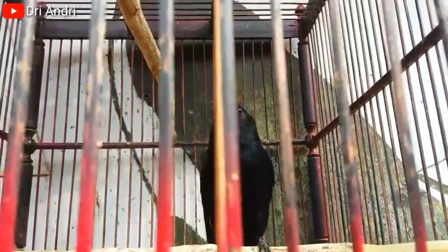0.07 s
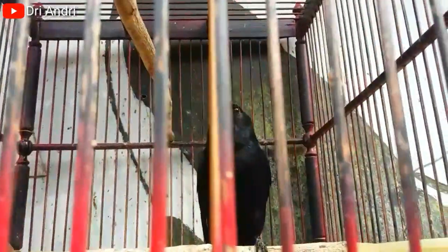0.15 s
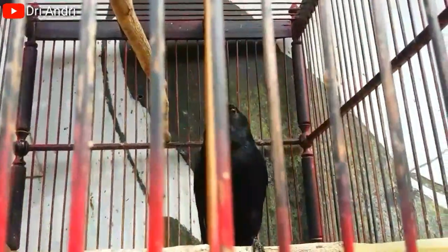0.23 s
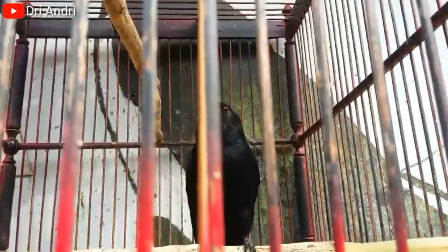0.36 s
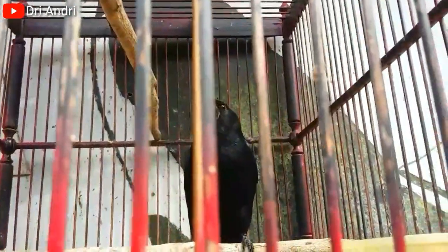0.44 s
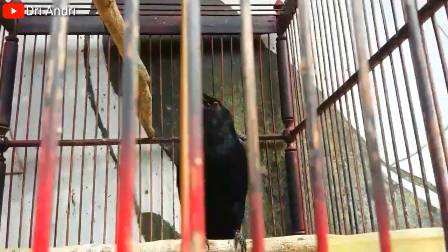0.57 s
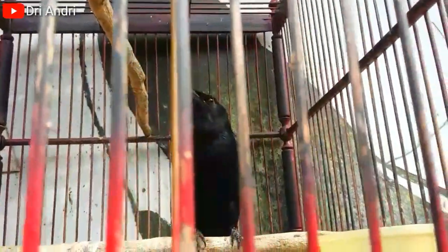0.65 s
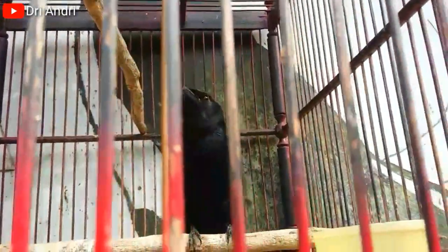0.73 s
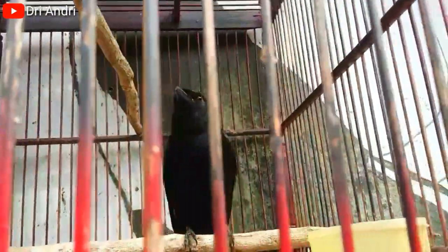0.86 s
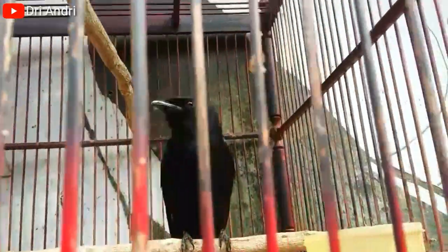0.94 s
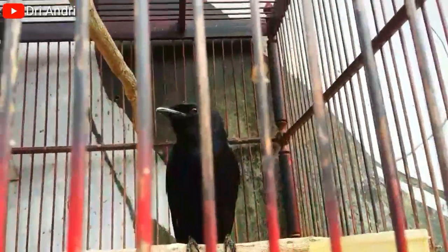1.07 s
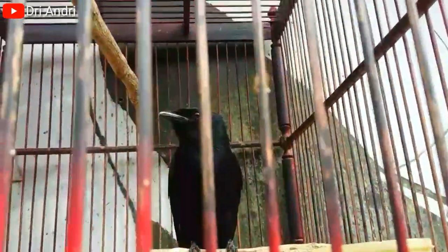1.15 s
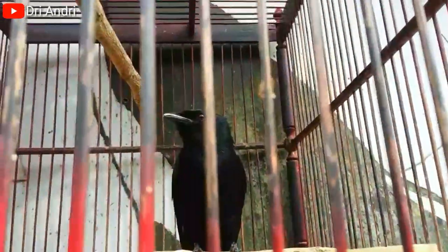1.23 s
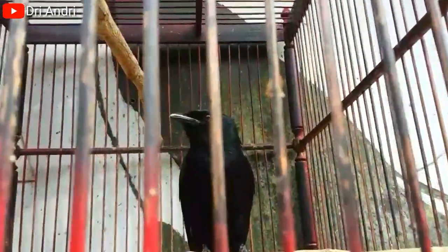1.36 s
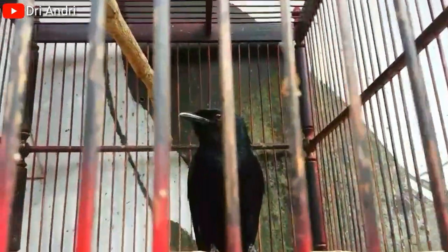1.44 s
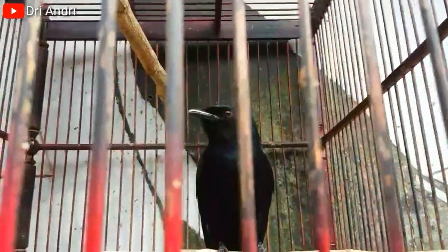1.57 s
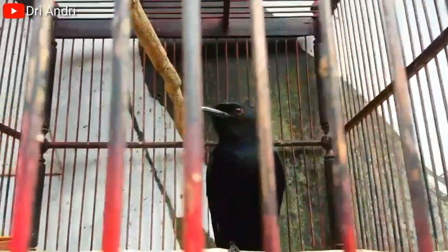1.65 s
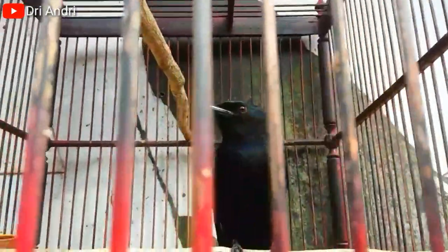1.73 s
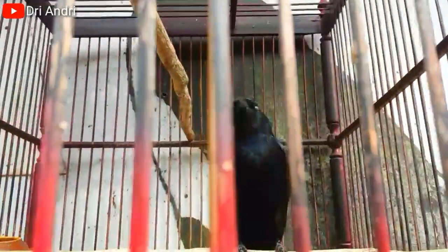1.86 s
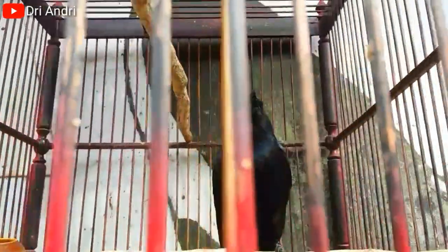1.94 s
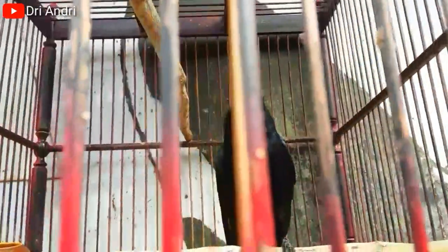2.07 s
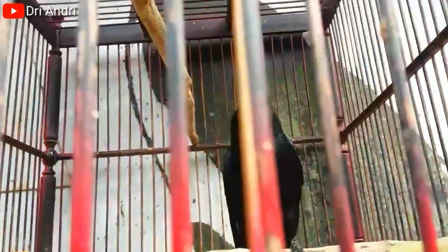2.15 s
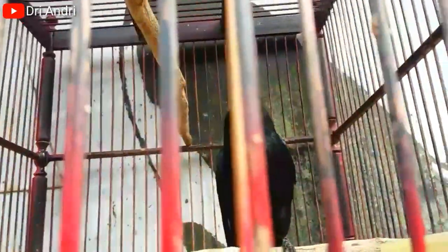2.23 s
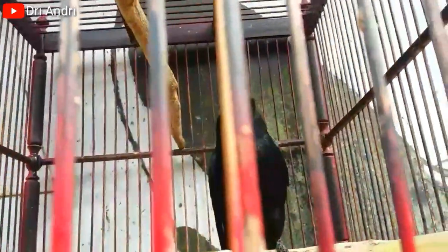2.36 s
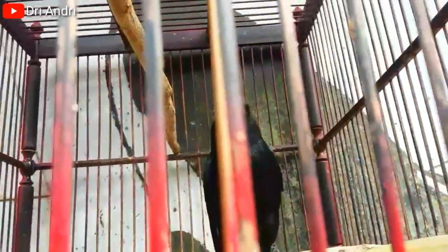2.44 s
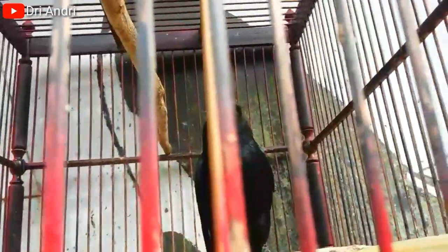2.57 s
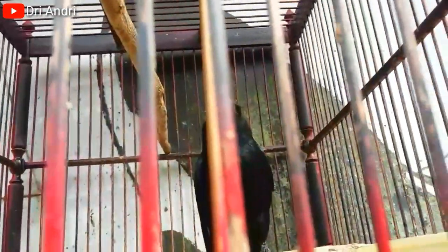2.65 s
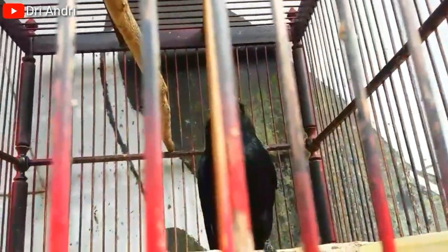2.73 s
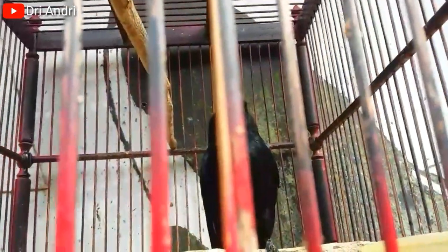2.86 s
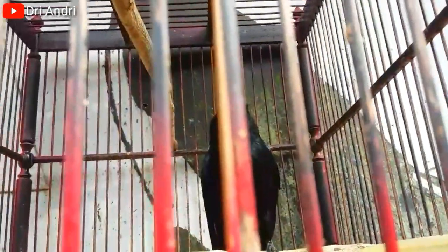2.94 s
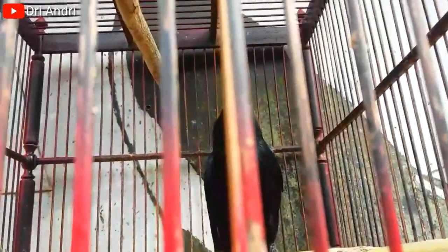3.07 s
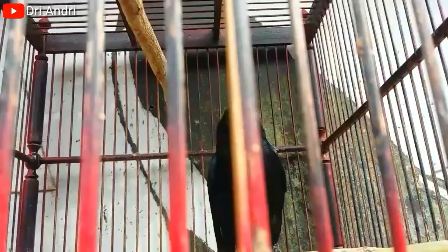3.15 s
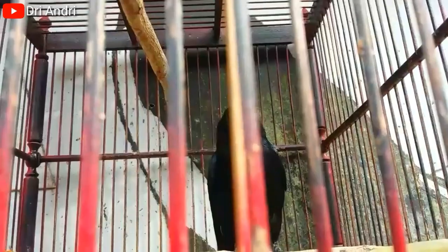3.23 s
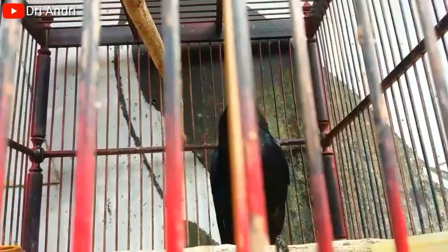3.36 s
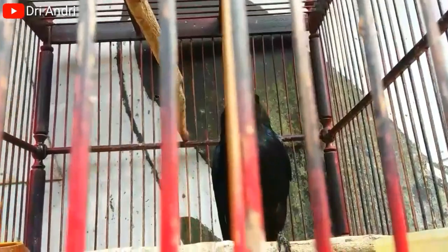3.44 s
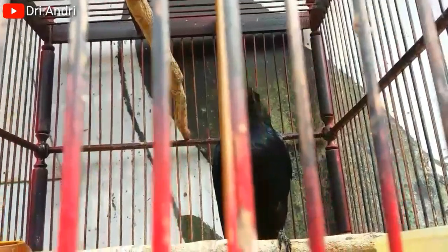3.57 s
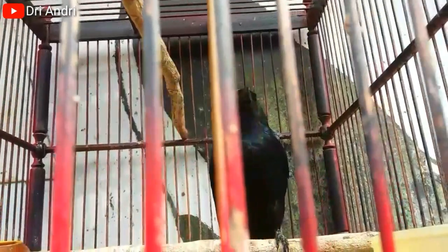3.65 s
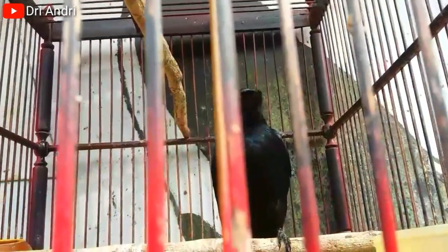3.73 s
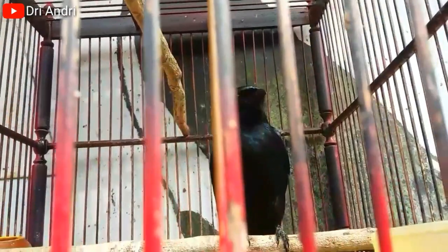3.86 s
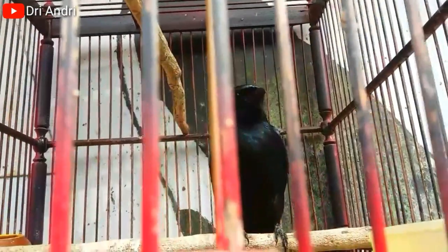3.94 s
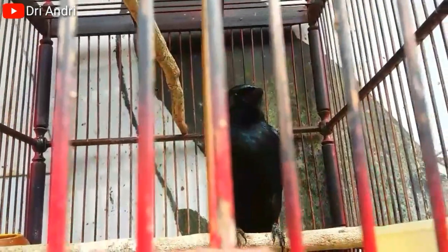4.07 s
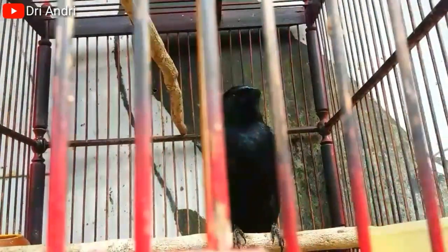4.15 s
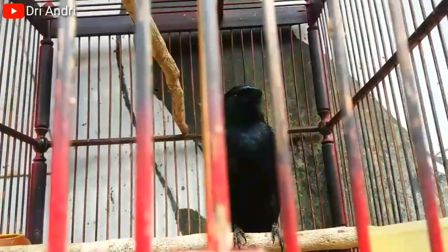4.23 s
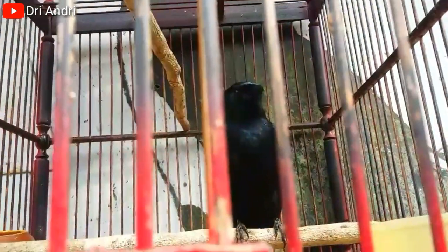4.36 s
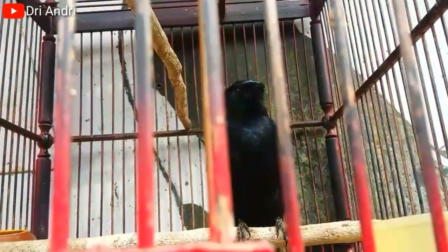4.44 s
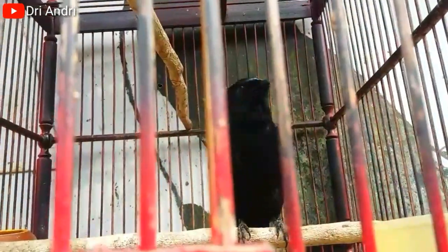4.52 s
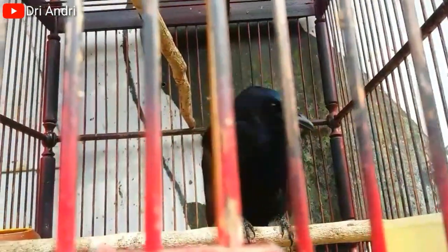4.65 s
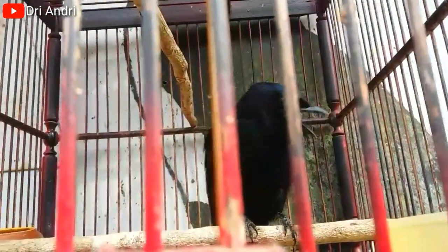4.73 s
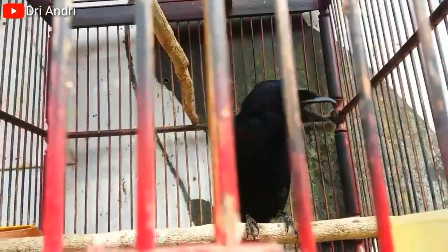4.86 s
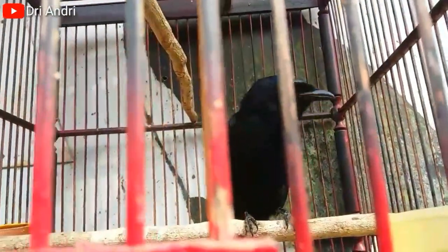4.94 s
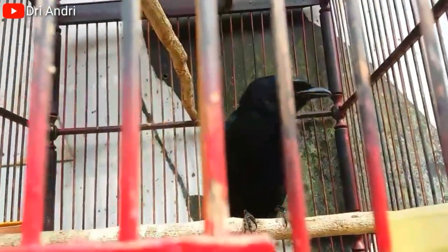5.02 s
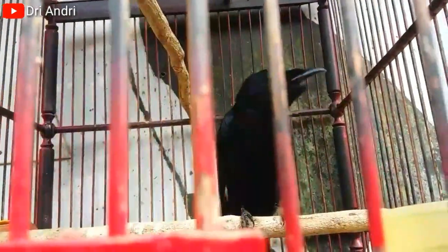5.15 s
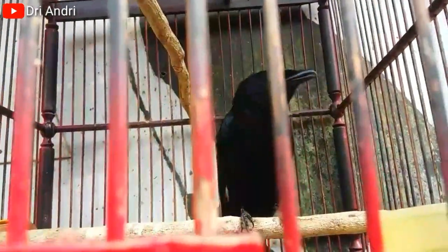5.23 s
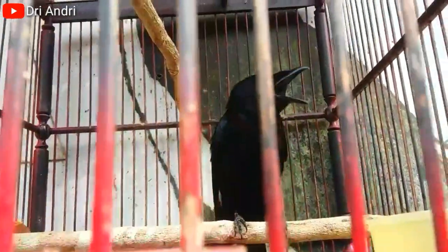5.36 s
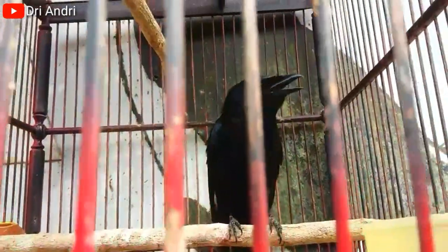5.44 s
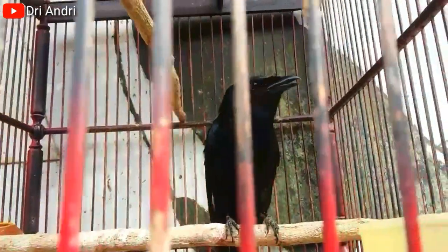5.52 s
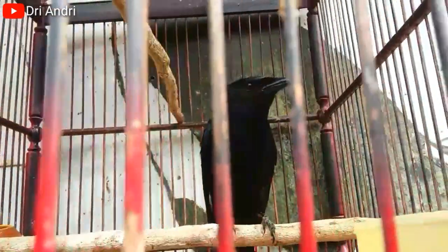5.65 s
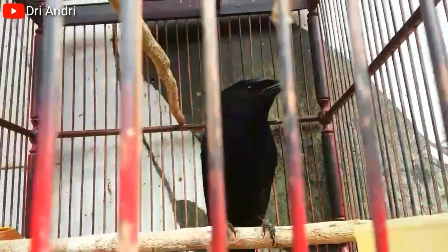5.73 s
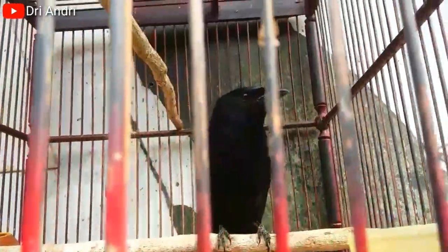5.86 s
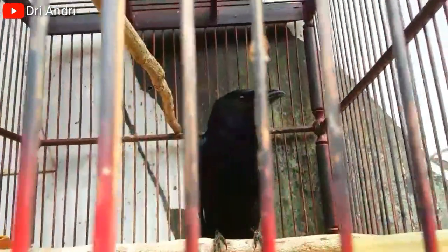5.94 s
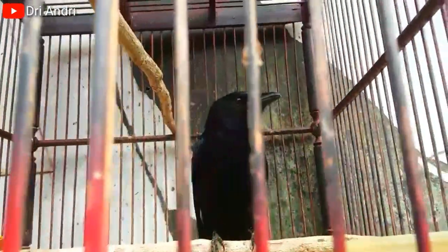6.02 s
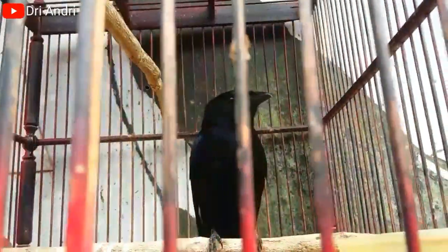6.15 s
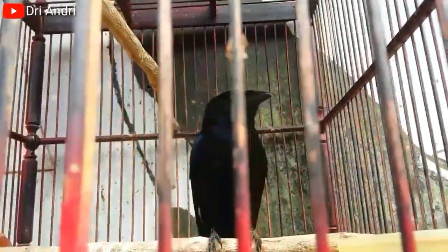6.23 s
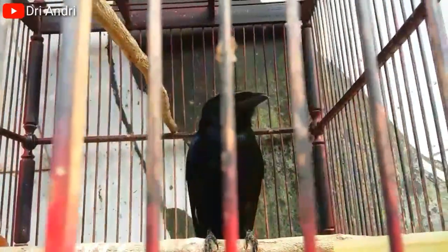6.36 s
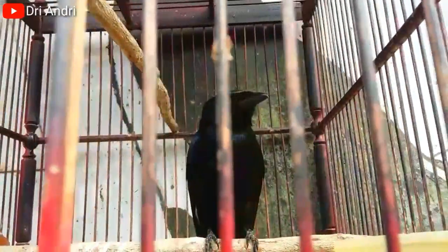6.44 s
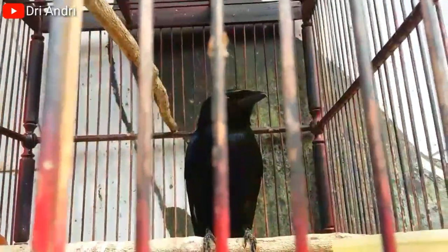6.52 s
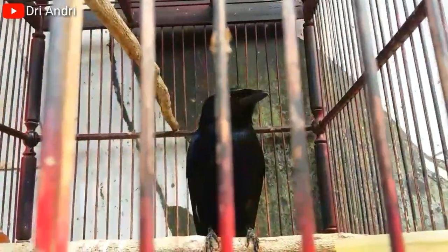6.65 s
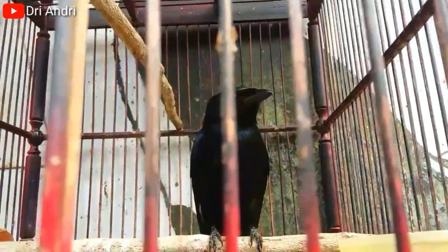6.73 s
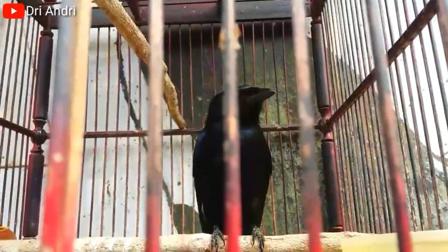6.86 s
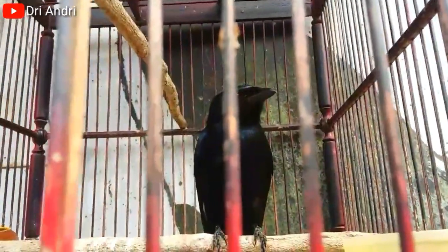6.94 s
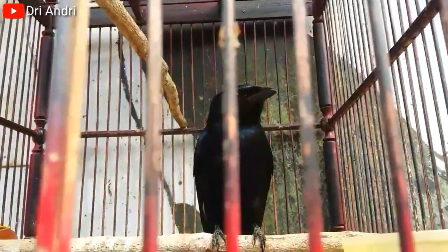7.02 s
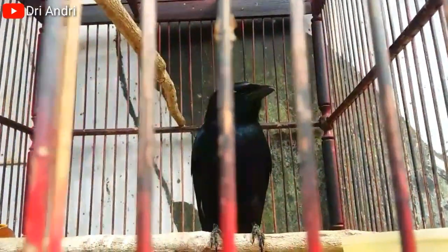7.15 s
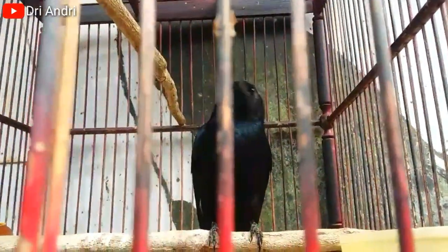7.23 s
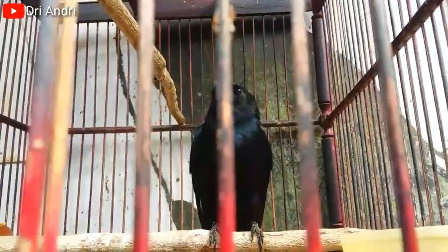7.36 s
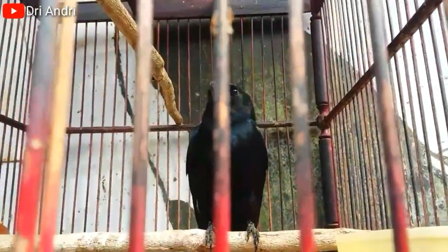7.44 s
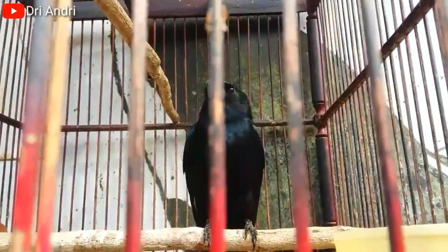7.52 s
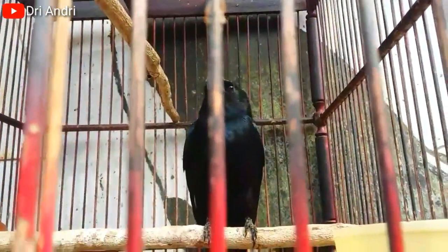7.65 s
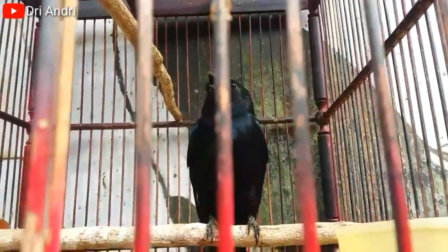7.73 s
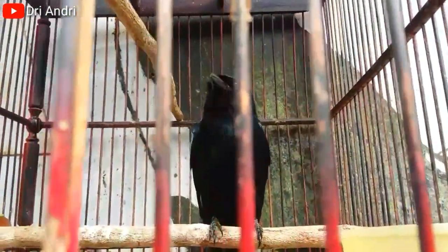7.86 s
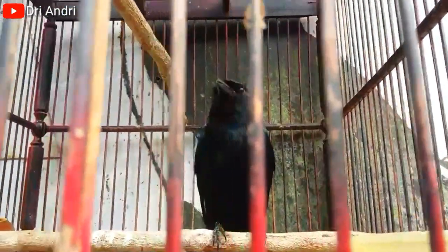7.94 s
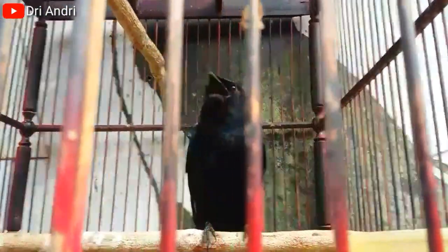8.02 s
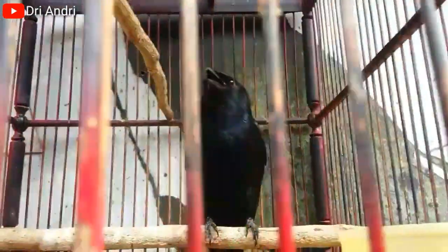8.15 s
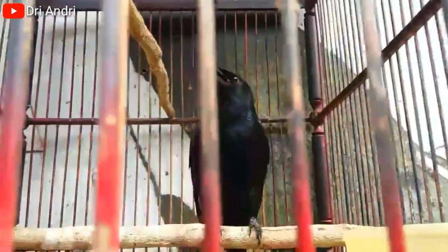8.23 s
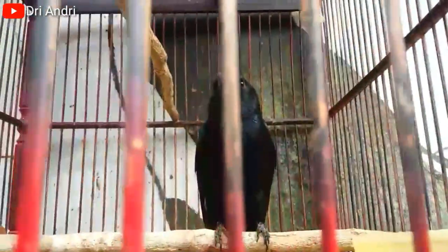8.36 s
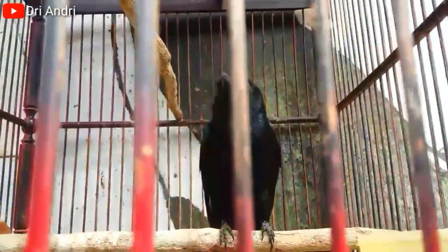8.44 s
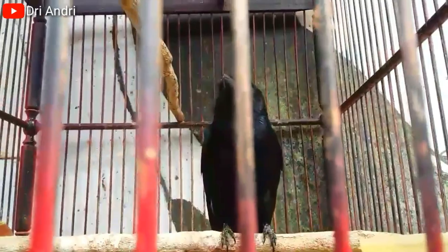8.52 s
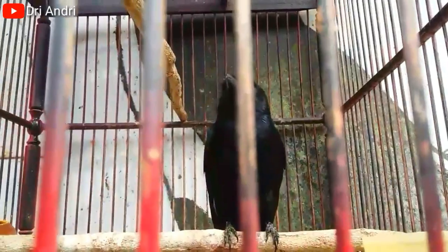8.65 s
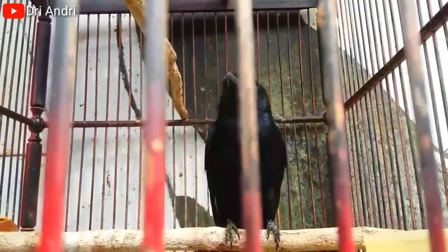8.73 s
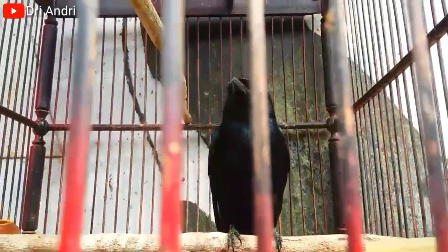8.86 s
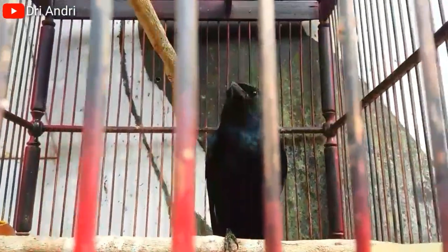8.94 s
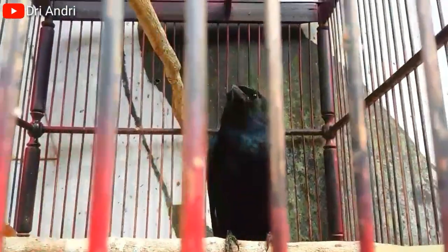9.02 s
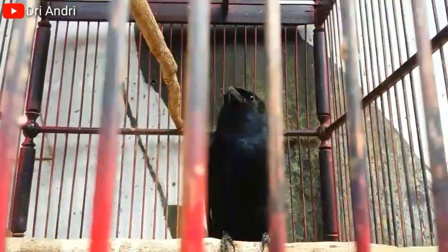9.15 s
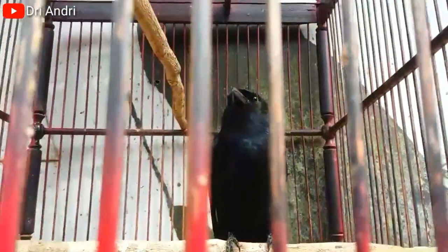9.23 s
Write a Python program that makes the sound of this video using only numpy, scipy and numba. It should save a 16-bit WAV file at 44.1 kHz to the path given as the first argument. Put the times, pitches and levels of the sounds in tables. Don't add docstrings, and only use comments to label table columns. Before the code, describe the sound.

Close, dry and piercing bird notes, each only a fraction of a second: clear upward whistles, buzzing rasps, hard doubled chaks and pips. They cluster at the start, around five seconds and around eight. Between them, softer neighbouring birds give hooked whistles, rough glides, low coos and rising swoops, blurred by short yard echoes. Low uneven street rumble, a faint distant motor, light hiss and a few tiny claw clicks complete the single-microphone outdoor scene.

```python
import sys
import numpy as np
from scipy import signal
from scipy.fft import rfft, irfft, next_fast_len
from scipy.io import wavfile
from scipy.ndimage import uniform_filter1d
from numba import njit

SR = 44100
rng = np.random.default_rng(int(sys.argv[2]) if len(sys.argv) > 2 else 0)


def convert_level_to_amplitude(level_db):
    exponent = np.asarray(level_db, float) / 20
    return 10 ** exponent


def int16_out(signal):
    q = np.round(np.clip(np.atleast_2d(signal).T, -1, 1) * 32767)
    wavfile.write(sys.argv[1], SR, q.astype(np.int16))


N = 409688

# start_s, second_partial_hz, level_db, overtones_db, fundamental_db
WHISTLES = [
    [(.474, 2600, -24, 4, -6), (.481, 3560, -20, 6, -4), (.488, 3765, -14, 5, -3),
     (.503, 3730, -17.5, 11, 8), (.511, 3870, -13, 3, 8), (.524, 4168, -16.5, 10, 9),
     (.552, 4358, -14.5, 6, -4), (.568, 4330, -18, 7, -6)],
    [(4.792, 3000, -24, -20, -6), (4.797, 3600, -9, -16, -12), (4.801, 3800, -14, -12, -4),
     (4.806, 3995, -8.5, -1, 0), (4.819, 3975, -8, -1, -3), (4.829, 4151, -10, 0, 0),
     (4.847, 4304, -10, -6, 0), (4.867, 4370, -10, -13, -4), (4.879, 4490, -16, -6, 0)],
    [(5.37, 2900, -24, -12, -6), (5.377, 3500, -16, -8, -10), (5.384, 3630, -11.5, -4, -8),
     (5.401, 3858, -12.5, -4, -11), (5.411, 3982, -8.5, -2, -6), (5.425, 4216, -12.5, 0, -6),
     (5.449, 4452, -10.5, -1, -8), (5.474, 4300, -21, -2, 0)],
    [(8.078, 2500, -30, -14, 14), (8.087, 3480, -19, -8, 6), (8.097, 3749, -11.5, -4, 2),
     (8.113, 3918, -6.5, -14, -10), (8.131, 4094, -6.5, -12, -11), (8.143, 4360, -14.5, -1, -17),
     (8.157, 4436, -8, -1, -25), (8.176, 4440, -17, -1, -25)],
]
# start_s, second_partial_hz, level_db
OPENING = [(0.043, 2674, -18), (0.053, 2696, -14), (0.073, 3116, -12), (0.079, 3340, -15),
           (0.089, 3527, -15), (0.098, 3454, -17)]
# start_s, first_partial_hz, level_db, optional overtones_db, fundamental_db
PIPS = [
    [(.326, 2050, -24, 14, 0), (.337, 2370, -22, 14, 0), (.342, 2510, -11.5, 9, 0), (.351, 2535, -11, 9, 0),
     (.358, 2520, -26.5, 16, 0)],
    [(2.054, 2990, -6), (2.058, 3030, -2.5)],
    [(2.046, 2950, -20), (2.05, 3000, -9), (2.052, 3000, -14)],
    [(8.311, 2650, -13), (8.314, 2600, -13)],
    [(7.455, 2500, -35), (7.461, 2730, -21), (7.471, 3200, -20), (7.48, 3150, -36)],
]
# start_s, first_partial_hz, level_db
LAST_PIP = [
    (9.13, 1460, -43.5),
    (9.158, 763, -48),
    (9.175, 2200, -30),
    (9.183, 3064, -17.5),
    (9.203, 4050, -39),
]
WHISTLE_PARTIALS = [-1, 10, 2, 2.5, 6, 5.5, -4, -1]
OPENING_PARTIALS = [-19.5, 4, -11, -17, -14, -29, -31]
PIP_PARTIALS = [5, -20.5, -30.5, -41.5]
# freq_hz, level_db
WHISTLE_THROAT = [(1200, -37), (2120, -8.5), (3350, -17.5), (4070, -9.5), (6000, -7.5), (8600, -14),
                  (9680, -26.5), (15500, -42.5)]
CHAK_THROAT = [(450, -31), (1300, -19), (2100, -6.5), (3400, -0.4), (4900, -16), (7000, -11.5), (9000, -29),
               (14000, -50)]
# start_s, length_s, throat_hz, level_db, beak_db
RASPS = [
    (.624, .094, 2842, -16.5, -9),
    (4.926, 0.095, 2847, -13, -7),
    (5.518, .09, 2809, -17.5, -6.5),
    (8.227, .09, 2822, -13.5, -9.5),
]
# start_s, throat_hz, level_db, beak_db
LOW_RASP = [
    (1.966, 2600, -14, -8),
    (1.978, 2448, -14, -4),
    (2.025, 2440, -15, -1.5),
    (2.05, 2743, -11.5, -7.5),
    (2.066, 2897, -23, -23),
]
RATTLE = [
    (0.09, 2920, -23, 4.5),
    (0.124, 2906, -26.5, -11.5),
    (0.264, 2850, -26, -14),
    (0.275, 2500, -43, -17),
]
# start_s, length_s, throat_hz, level_db, beak_db
DOUBLES = [
    (5.16, .024, 4600, -20, 6.5),
    (5.206, 0.027, 4900, -17, 6),
    (7.79, 0.023, 4417, -10, -8),
    (7.837, .028, 4374, -11, -3),
]
# start_s, length_s, throat_hz, level_db, beak_db
LEAD_INS = [(.026, 0.021, 2650, -31.5, -8), (.318, .022, 2248, -24, -7), (.456, 0.027, 2940, -21, -6),
            (4.778, 0.018, 3300, -13.5, -8), (5.355, .023, 3500, -20, -2.5), (.537, .016, 5400, -27, 0),
            (7.82, .008, 3200, -23, -6), (7.408, .048, 2845, -35.5, -20), (8.066, .022, 3608, -13, -10),
            (9.13, 0.056, 2722, -33.5, -28)]
# start_s, length_s, first_partial_hz, level_db
CHAKS = [
    (.364, .02, 1153, -14.5),
    (4.566, 0.035, 1290, -8),
    (5.977, .027, 1176, -16),
]
# length_share, pitch_factor, level_db, beak_db (chak: no beak_db)
RASP_SHAPE = [(0, 1.01, -3.5, 3.5), (.15, 1.0, -1, 2), (.82, .965, -0.1, -4), (1, .9, -9, -14.5)]
DOUBLE_SHAPE = [(0, 1, -7, 1.5), (.15, 1, 0.9, 0.1), (.75, 1, -3, 0.1), (1, 1, -16.5, -2)]
LEAD_SHAPE = [(0, 1, 2, 2), (.12, 1, 1, 1), (.25, 1, -5, -3), (.6, 1, -4, -4.5), (1, 0.96, 0, 2)]
CHAK_SHAPE = [(0, 1.01, -3.5), (.14, 0.95, 1.9), (.42, .62, -5), (1, .42, -20)]
# freq_hz, width_hz, level_db
SIDE_MODES = [(720, 400, -24), (1400, 450, -22), (2100, 500, -13.5)]
BEAK_MODES = [(6580, 1400, 13.5), (8400, 1400, -1.5), (9100, 1000, -3), (12000, 1800, -19),
              (14000, 2200, -31.5)]
TICKS = [
    0.844,
    2.652,
    5.957,
]
# start_s, length_s, from_hz, to_hz, level_db
FAR_LOW = [(.9, 0.041, 813, 820, -47), (1.18, 0.099, 856, 830, -47), (2.98, 0.23, 549, 507, -51.5),
           (2.8, .05, 1000, 990, -57), (3.12, .06, 950, 960, -57), (5.26, 0.071, 878, 1024, -47),
           (6.06, 0.23, 886, 1100, -50), (6.675, .05, 600, 600, -52.5), (7.19, .05, 600, 600, -56.5),
           (7.33, .04, 590, 590, -58), (7.405, .033, 1400, 957, -40.5), (7.425, 0.079, 904, 946, -38),
           (7.53, 0.094, 881, 863, -42), (7.69, .07, 878, 966, -39), (7.82, .1, 885, 868, -45),
           (7.96, 0.062, 882, 860, -48.5), (8.12, .08, 920, 1136, -45.5)]
FAR_MID = [(0.001, 0.018, 1710, 1670, -27.5), (.365, .04, 1720, 1560, -40), (1.17, .08, 1750, 1560, -52),
           (2.265, .03, 4650, 4750, -56), (3.07, .2, 3450, 3400, -46), (2.86, .12, 1250, 1300, -58),
           (6.81, .07, 1380, 1340, -58), (6.88, .025, 2150, 2200, -54), (7.02, .025, 2100, 2400, -56),
           (7.25, .09, 1600, 1540, -56), (2.11, 0.073, 7200, 6780, -36), (2.35, 0.12, 4650, 5280, -55),
           (2.335, .22, 2210, 2723, -46), (2.69, 0.069, 2510, 1976, -49), (2.97, .09, 2070, 2480, -50),
           (3.015, 0.064, 3664, 3325, -30.5), (3.15, 0.13, 1660, 1570, -57.5),
           (6.32, .17, 1402, 1720, -39.5), (6.485, 0.13, 1693, 1520, -37), (8.33, 0.096, 1270, 1325, -49),
           (8.43, 0.11, 1494, 1341, -38.5), (8.44, 0.083, 7350, 7100, -49), (8.605, 0.065, 1478, 1587, -34),
           (8.665, 0.14, 1502, 1602, -34.5), (8.77, 0.15, 1710, 1503, -43)]
RISES = [
    (7.362, .04, 1300, 1750, -38),
    (7.485, .027, 1250, 1995, -31.5),
    (7.592, 0.029, 1300, 2040, -37),
    (7.73, 0.032, 1245, 2095, -34),
    (7.885, .024, 1330, 2070, -36),
]
GLIDES = [(1.55, .09, 3950, 2700, -35), (1.665, .1, 4000, 3100, -34.5), (1.79, .08, 4000, 3200, -31),
          (3.856, .08, 4200, 3000, -31), (4.01, .075, 4200, 3060, -28), (4.16, 0.031, 4300, 3220, -26.5),
          (2.46, 0.042, 4900, 3340, -41.5), (2.691, .07, 4800, 3100, -40), (1.84, .16, 4550, 5800, -39),
          (4.075, .17, 4500, 6500, -36), (6.02, .17, 4500, 6400, -46), (7.87, .088, 4000, 6500, -34.5),
          (1.005, .06, 6000, 8500, -50.5)]
CHATTER = [(3.28, 0.026, 7180, 4670, -37.5), (3.4, 0.027, 7210, 3980, -38.5),
           (3.48, .034, 7080, 4390, -44.5), (3.57, .037, 7180, 4020, -45.5), (4.4, .03, 7010, 4500, -45),
           (4.455, .02, 5300, 5000, -38), (4.46, .07, 6900, 5900, -39), (4.71, .06, 2600, 2900, -45),
           (4.72, .05, 4500, 5500, -48), (5.24, 0.031, 4970, 6240, -44), (8.54, .02, 5800, 3220, -45.5),
           (9.02, .029, 6470, 2920, -47.5), (7.15, 0.094, 2210, 1850, -58)]
PEEPS = [
    (1.155, 0.033, 4590, 7400, -46.5),
    (1.21, 0.049, 5140, 7400, -39.5),
    (1.262, .06, 4430, 7200, -42),
]
# start_s, hold_s, pitch_hz, rise_s, level_db
HOOKS = [
    (.14, .055, 1630, .06, -33),
    (.405, .055, 1510, .05, -40),
    (.69, .046, 1570, .052, -33),
    (.974, .05, 1550, .036, -34),
    (1.26, .055, 1495, .022, -43),
]
# start_s, pitch_hz, level_db
MOTOR = [
    (2.3, 347.6, -62.5),
    (3.1, 368, -55.5),
    (3.9, 412.2, -55.5),
    (4.3, 420, -63),
]
# start_s, level_db
STREET_LEVEL = [(0, -58), (.9, -54), (1.6, -53), (1.9, -50), (2.6, -53), (3.9, -52.5), (4.3, -48.5),
                (5.25, -56.5), (5.7, -63.5), (6.05, -61.5), (6.62, -56), (7.16, -58), (7.7, -52), (8.351, -61),
                (9.29, -57)]
# freq_hz, level_db_per_hz
RUMBLE = [(13, -50), (32, -25.5), (70, -3.5), (172, 2.5), (235, -5), (560, -8), (1200, -22.5), (2640, -110)]
HISS = [(470, -41.5), (850, -3.5), (1990, -6), (2730, -9), (4450, -10.5), (7280, -2), (8430, -8),
        (15000, -16.5)]

YARD_T60_S, FAR_T60_S, FURTHER_T60_S = 0.25, 0.26, 0.42
HISS_DB, HISS_FOLLOWS = -58.5, .8
PUFF_DB, UNDERTONE_DB = -38, -18
HOOK_TOP, HOOK_FADE_DB = 1.38, -3.0
ECHO_S, ECHO_DB = .061, -11


def near_bird():
    return whistles_and_pips() + rasps() + breathy_notes() + rattle() + chaks() + undertones()


def whistles_and_pips():
    whistles = tones(WHISTLES, partials(WHISTLE_PARTIALS), share=.5, waver=.003, flutter_db=1.5,
                     attack_s=.003, throat=WHISTLE_THROAT)
    opening = tones([OPENING], partials(OPENING_PARTIALS), share=.5, waver=.003, flutter_db=2.5, attack_s=.003)
    pips = tones(PIPS + [LAST_PIP], partials(PIP_PARTIALS), share=.96, waver=.005, flutter_db=-4.5,
                 attack_s=.002, scoop=.13)
    return whistles + opening + pips


def rasps():
    voiced = dict(jitter=.02, uneven_db=2.0, breath=.5, drop=.035, beak_ratio=1, beak_air=1.2)
    high = harsh(unfold(RASPS, RASP_SHAPE), width_hz=520, upper_hz=3600, upper_db=-7, gate_hz=253.8,
                 gate=.36, warble=.03, **voiced)
    low = harsh([LOW_RASP], width_hz=800, upper_hz=3500, upper_db=3.5, gate_hz=310.4,
                gate=.3, warble=.035, **voiced)
    return high + low


def breathy_notes():
    breathy = dict(jitter=.25, uneven_db=4.5, breath=1.0, width_hz=930, gate_hz=300, gate=.25,
                   drop=.12, beak_ratio=.9)
    doubles = harsh(unfold(DOUBLES, DOUBLE_SHAPE), upper_hz=3100, upper_db=-21, **breathy)
    return doubles + harsh(unfold(LEAD_INS, LEAD_SHAPE), upper_hz=2600, upper_db=-10, **breathy)


def rattle():
    return harsh([RATTLE], jitter=.07, uneven_db=2.5, breath=.6, width_hz=550, upper_hz=2000, upper_db=-9,
                 gate_hz=145, gate=.6, drop=0, beak_ratio=.97)


def chaks():
    notes = [[(s + share * length_s, factor * hz, db + d_db) for share, factor, d_db in CHAK_SHAPE]
             for s, length_s, hz, db in CHAKS]
    return tones(notes, [(k, 0) for k in range(1, 25)], share=1, waver=.045, flutter_db=5, attack_s=.001,
                 throat=CHAK_THROAT, waver_hz=700, flutter_hz=250, loose=.6)


def undertones():
    notes = [[(s, hz, db + UNDERTONE_DB) for s, hz, db, _ in rows]
             for rows in unfold(RASPS, RASP_SHAPE) + [LOW_RASP]]
    return tones(notes, [(.5, -13), (1, 0), (1.5, -5)], share=.5, waver=.012, flutter_db=3.0,
                 attack_s=.003, flutter_hz=120)


def tones(notes, orders, share, waver, flutter_db, attack_s, throat=((1, 0), (2, 0)), scoop=0,
          waver_hz=250, flutter_hz=56, loose=0):
    out = np.zeros(N)
    for rows in notes:
        start, edges, (hz, db, *colour) = note(rows, attack_s, release_s=.004)
        over_db, low_db = colour or (0, 0)
        size = len(hz)
        hz = share * hz * (1 - scoop * np.exp(-np.arange(size) / SR / .0013))
        phase = 2 * np.pi * np.cumsum(hz * (1 + waver * wobble(size, waver_hz))) / SR
        stack = np.zeros(size)
        for k, order_db in orders:
            level_db = order_db + along(throat, k * hz) + over_db * (k > 2) + low_db * (k == 1)
            level_db = level_db + flutter_db * wobble(size, flutter_hz)
            stack += convert_level_to_amplitude(level_db) * np.sin(k * phase + loose * rng.uniform(-3, 3))
        power = uniform_filter1d(stack ** 2, size=400)
        evened = stack / np.sqrt(power + .1 * np.mean(stack ** 2))
        add(out, start, edges * convert_level_to_amplitude(db) * evened)
    return out


def harsh(notes, jitter, uneven_db, breath, width_hz, upper_hz, upper_db, gate_hz, gate, drop, beak_ratio,
          warble=0, beak_air=0):
    out = np.zeros(N)
    beak_modes = [(beak_ratio * hz, w_hz, db) for hz, w_hz, db in BEAK_MODES]
    for rows in notes:
        start, edges, (throat_hz, db, beak_db) = note(rows, attack_s=.001, release_s=.003)
        size = len(db)
        throat_hz = throat_hz * (1 + drop * np.exp(-np.arange(size) / SR / .006))
        beat = np.cos(2 * np.pi * np.cumsum(gate_hz * (1 + .07 * wobble(size, 80))) / SR)
        snap_hz = throat_hz / 2 * (1 + jitter * wobble(size, 500) + warble * beat)
        count = np.floor(np.cumsum(snap_hz) / SR)
        snap = np.diff(count, prepend=0) > 0
        strong = np.where(count % 2, 1, .4)
        source = unit_rms(snap * strong * convert_level_to_amplitude(uneven_db * rng.standard_normal(size)))
        source = source + breath * rng.standard_normal(size)
        source *= 1 + gate * beat
        airy = source + beak_air * rng.standard_normal(size)
        throat = ring(source, [(throat_hz, width_hz, 0), (upper_hz, 800, upper_db)] + SIDE_MODES)
        beak = ring(airy, beak_modes)
        add(out, start, edges * convert_level_to_amplitude(db) * (unit_rms(throat) + convert_level_to_amplitude(beak_db) * unit_rms(beak)))
    return out


def ring(x, modes):
    return sum((-1) ** k * convert_level_to_amplitude(db) * mode(mode(x, hz, w_hz), hz, 2 * w_hz)
               for k, (hz, w_hz, db) in enumerate(modes))


def ticks():
    clicks = np.zeros(N)
    clicks[(np.array(TICKS) * SR).astype(int)] = convert_level_to_amplitude(-20.5)
    return mode(clicks, 5500., width_hz=3000)


def puffs():
    out, t = np.zeros(N), np.arange(int(.06 * SR)) / SR
    puff = convert_level_to_amplitude(PUFF_DB) * np.sin(2 * np.pi * 95 * t) * np.exp(-t / .021)
    for row in DOUBLES + PIPS[1][:1] + CHAKS[1:2]:
        add(out, int(row[0] * SR), puff)
    return out


def far_birds():
    far, further = far_whistlers() + hooks(), far_chirpers()
    far = .8 * far + convert_level_to_amplitude(-2.2) * walls(far, FAR_T60_S, first_s=.003, dull_hz=6000)
    return far + .45 * further + convert_level_to_amplitude(-.5) * walls(further, FURTHER_T60_S, first_s=.002, dull_hz=9000)


def far_whistlers():
    low = shaped(FAR_LOW, start_db=-3.5, end_db=-19, rise=.4, fall=.4)
    mid = shaped(FAR_MID, start_db=-6, end_db=-15.5, rise=.55, fall=.45, peak=.35)
    rises = shaped(RISES, start_db=-6, end_db=-1.5, rise=.55, fall=0)
    return tones(low + mid + rises, [(1, 5.5), (2, -34)], share=1, waver=.005, flutter_db=4.2, attack_s=.0037)


def hooks():
    notes = []
    for s, hold_s, hz, rise_s, db in HOOKS:
        turn_s = s + hold_s
        notes.append([(s, 1.01 * hz, db - 5), (s + .5 * hold_s, hz, db), (turn_s, 1.005 * hz, db - 5),
                      (turn_s + .4 * rise_s, 1.21 * hz, db + 1.5),
                      (turn_s + rise_s, HOOK_TOP * hz, db + HOOK_FADE_DB)])
    calls = tones(notes, [(1, 0), (2, -38)], share=1, waver=.005, flutter_db=3.0, attack_s=.006)
    add(calls, int(ECHO_S * SR), convert_level_to_amplitude(ECHO_DB) * calls.copy())
    return calls


def far_chirpers():
    glides = shaped(GLIDES, start_db=-12, end_db=-14, rise=.55, fall=.3, peak=.42)
    peeps = shaped(PEEPS, start_db=-3, end_db=-9.5, rise=.0302, fall=0, peak=.45)
    chatter = shaped(CHATTER, start_db=-.5, end_db=-4.5, rise=.3, fall=.65)
    rough = tones(glides + peeps, [(1, 0), (2, -19)], share=1, waver=.03, flutter_db=4, attack_s=.006,
                  throat=[(9000, 0), (10500, -20)])
    return rough + tones(chatter, [(1, 0), (1.4, -13)], share=1, waver=.085, flutter_db=4, attack_s=.004,
                         waver_hz=900)


def walls(x, t60_s, first_s, dull_hz):
    t = np.arange(int(.8 * SR)) / SR
    white = rng.standard_normal(len(t))
    dull = signal.sosfilt(signal.butter(1, dull_hz, fs=SR, output="sos"), white)
    tail = dull * convert_level_to_amplitude(-60 * t / t60_s) + (white - dull) * convert_level_to_amplitude(-95 * t / t60_s)
    tail = tail * (t > first_s)
    return signal.fftconvolve(x, tail / np.sqrt(np.sum(tail ** 2)))[:N]


def motor():
    return tones([MOTOR], [(1, 7), (1.17, 5.5), (1.5, -2.5)], share=.87, waver=.013, flutter_db=-2.5,
                 attack_s=.11, waver_hz=7.1)


def street():
    street_db = np.interp(np.arange(N) / SR, *np.transpose(STREET_LEVEL))
    hum = unit_rms(mode(rng.standard_normal(N), 160., width_hz=5))
    rumble = convert_level_to_amplitude(street_db + 1.8 * wobble(N, 6)) * (coloured(RUMBLE) + .14 * hum)
    hiss_db = HISS_DB + HISS_FOLLOWS * (street_db - street_db.mean()) + .8 * wobble(N, 8)
    return rumble + convert_level_to_amplitude(hiss_db) * coloured(HISS)


def unfold(table, shape):
    return [[(s + share * length_s, factor * hz, db + d_db, beak_db + d_beak_db)
             for share, factor, d_db, d_beak_db in shape]
            for s, length_s, hz, db, beak_db in table]


def shaped(table, start_db, end_db, rise, fall, peak=.31):
    notes = []
    for s, length_s, from_hz, to_hz, db in table:
        covered = rise if to_hz > from_hz else fall
        peak_hz = from_hz + (to_hz - from_hz) * covered
        notes.append([(s, from_hz, db + start_db), (s + peak * length_s, peak_hz, db),
                      (s + length_s, to_hz, db + end_db)])
    return notes


def partials(levels_db):
    return list(enumerate(levels_db, start=1))


def note(rows, attack_s, release_s):
    s, *columns = np.transpose(rows)
    end_s = s[-1] + release_s
    t = np.arange(s[0], end_s, 1 / SR)
    edges = np.clip((t - s[0]) / attack_s, 0, 1) * np.clip((end_s - t) / release_s, 0, 1)
    return int(s[0] * SR), edges, [np.interp(t, s, c) for c in columns]


def add(out, start, x):
    out[start:start + len(x)] += x[:N - start]


def unit_rms(x):
    return x / np.sqrt(np.mean(x ** 2) + 1e-20)


def wobble(size, hz):
    r = np.exp(-2 * np.pi * hz / SR)
    return unit_rms(signal.lfilter([1], [1, -2 * r, r * r], rng.standard_normal(size + 2000))[2000:])


@njit
def resonate(x, turn, r):
    y = np.zeros(len(x))
    for i in range(2, len(x)):
        y[i] = (1 - r * r) / 2 * (x[i] - x[i - 2]) + 2 * r * np.cos(turn[i]) * y[i - 1] - r * r * y[i - 2]
    return y


def mode(x, hz, width_hz):
    return resonate(x, 2 * np.pi * hz / SR * np.ones(len(x)), np.exp(-np.pi * width_hz / SR))


def along(points, hz):
    points = np.array(points)
    return np.interp(np.log(hz), np.log(points[:, 0]), points[:, 1])


def coloured(points):
    size = next_fast_len(N)
    hz = np.maximum(np.fft.rfftfreq(size, 1 / SR), 1)
    return unit_rms(irfft(rfft(rng.standard_normal(size)) * convert_level_to_amplitude(along(points, hz)), size)[:N])


def scene():
    near = near_bird() + ticks()
    near = near + convert_level_to_amplitude(-15.5) * walls(near, YARD_T60_S, first_s=.0043, dull_hz=5000)
    return np.tile(near + far_birds() + puffs() + street() + motor(), (2, 1))


def roll_off(x):
    return signal.sosfilt(signal.butter(12, 16450, fs=SR, output="sos"), x)


def record(dry):
    rounded = .93 * np.tanh(dry / .86)
    top_cut = signal.cheby2(16, 60, 16250, fs=SR, output="sos")
    return roll_off(signal.sosfilt(top_cut, rounded))


dry = scene()
out = record(dry)
int16_out(out)
```